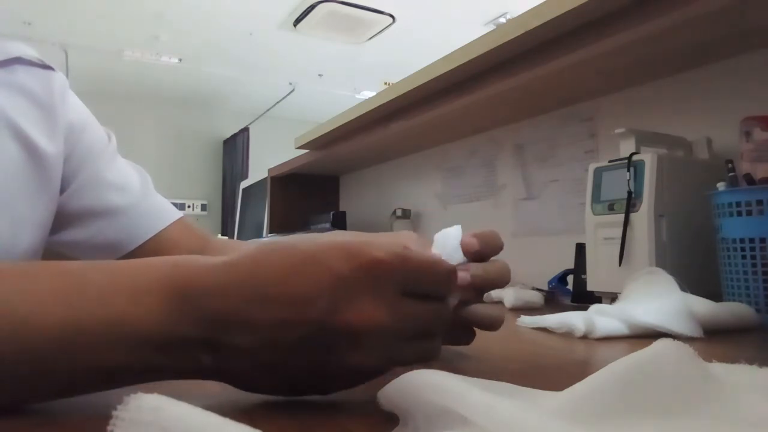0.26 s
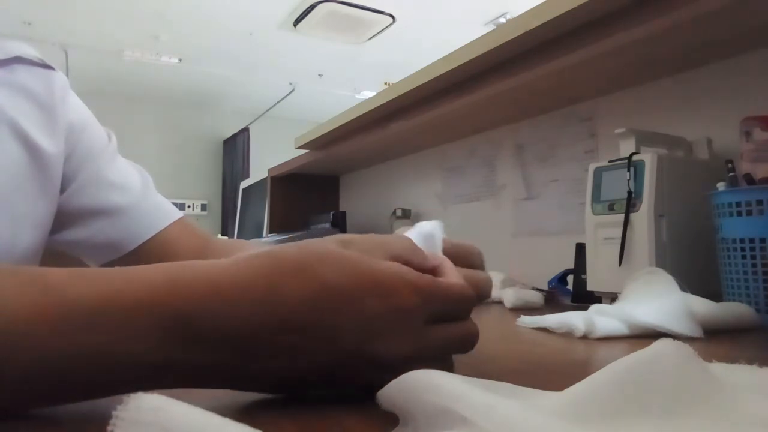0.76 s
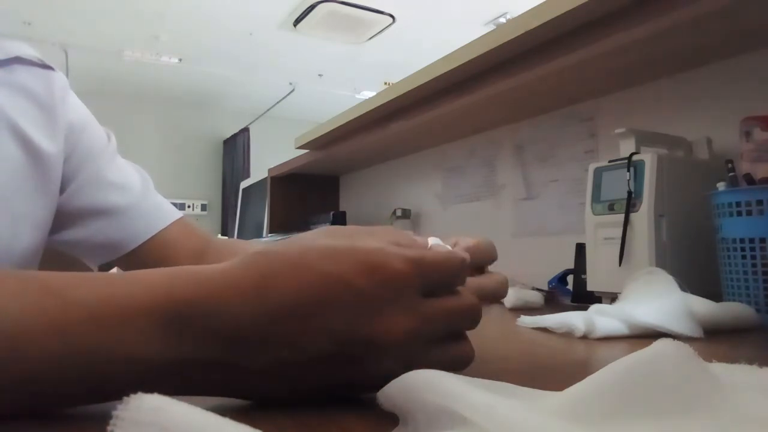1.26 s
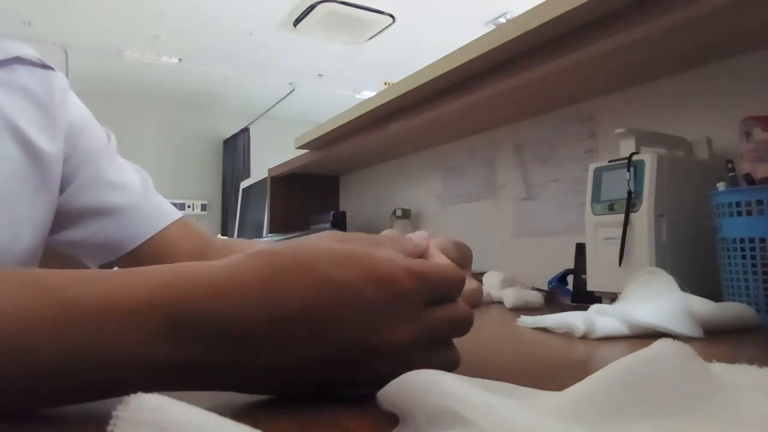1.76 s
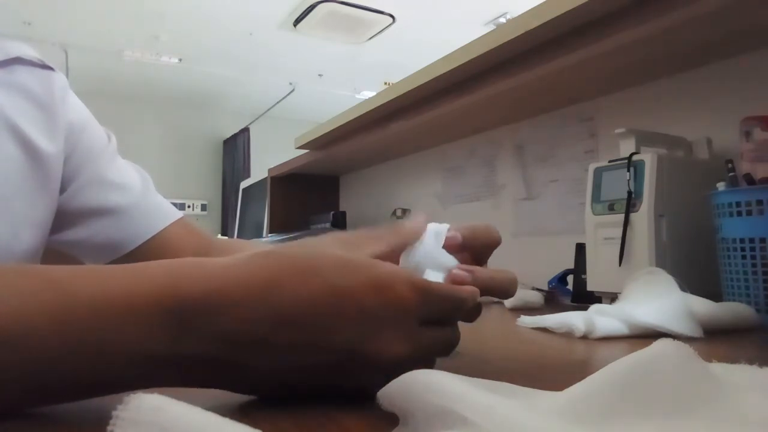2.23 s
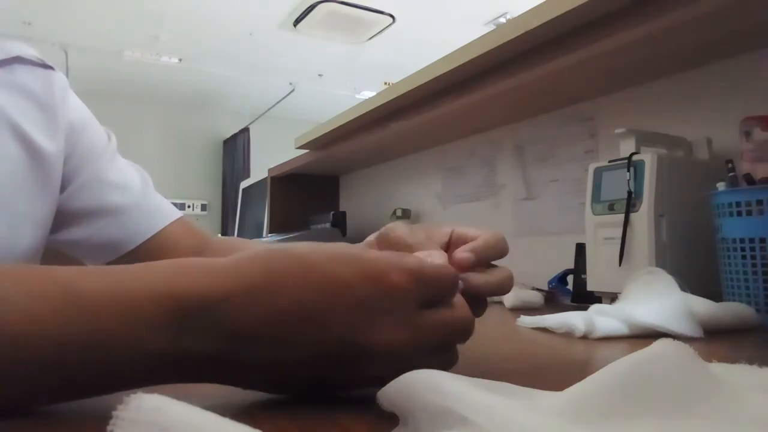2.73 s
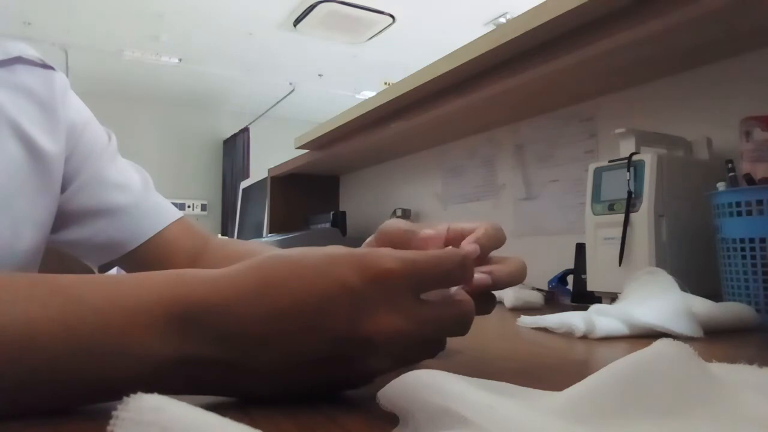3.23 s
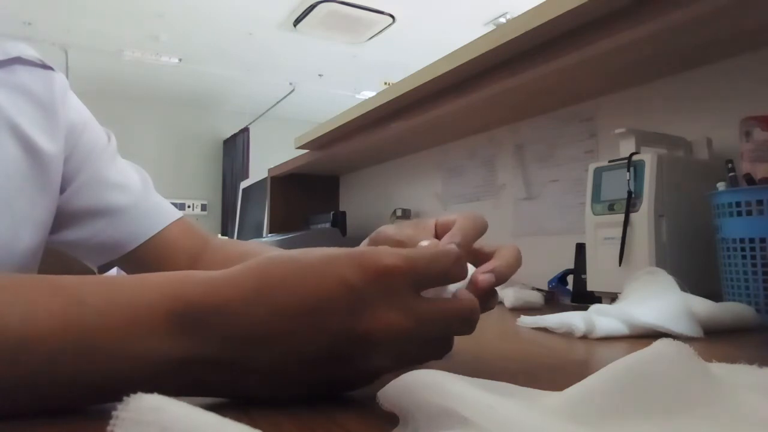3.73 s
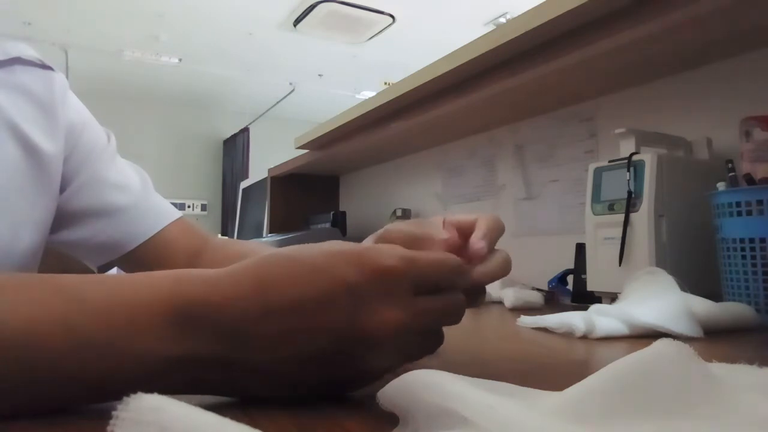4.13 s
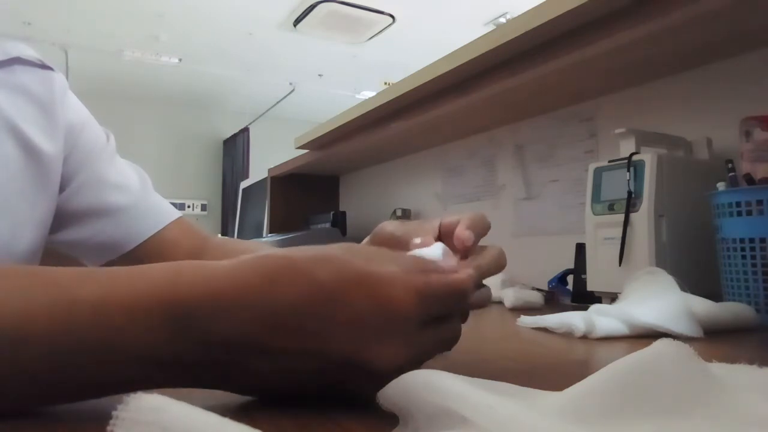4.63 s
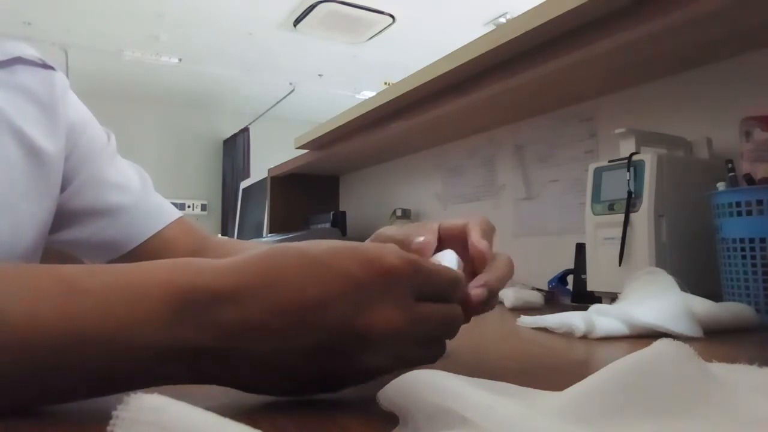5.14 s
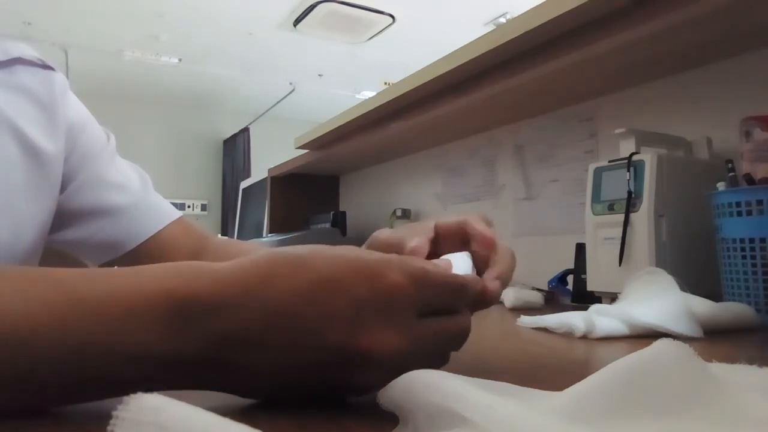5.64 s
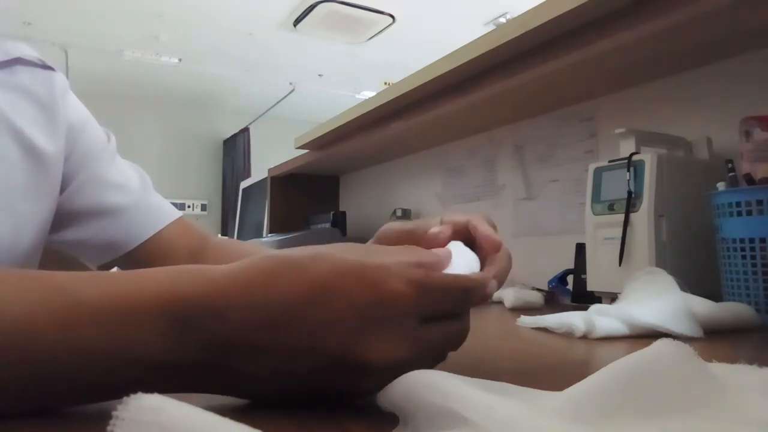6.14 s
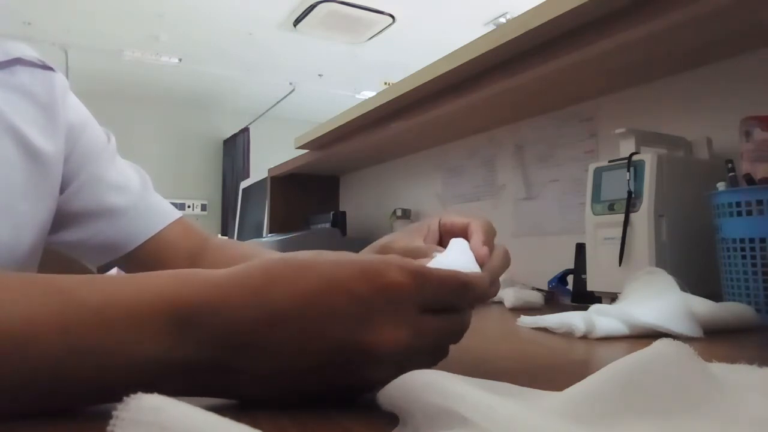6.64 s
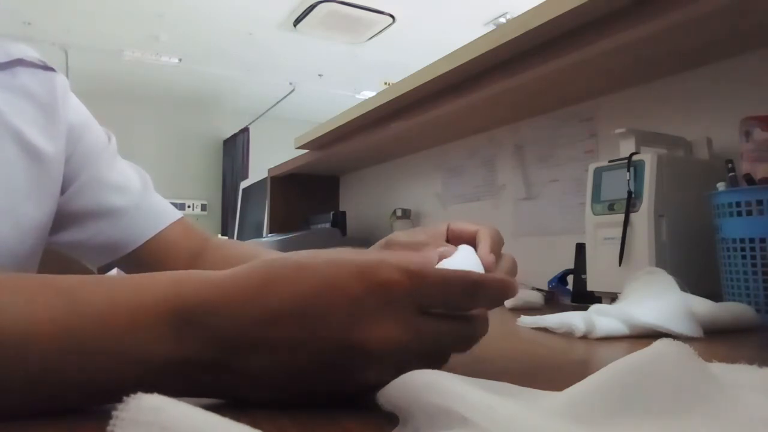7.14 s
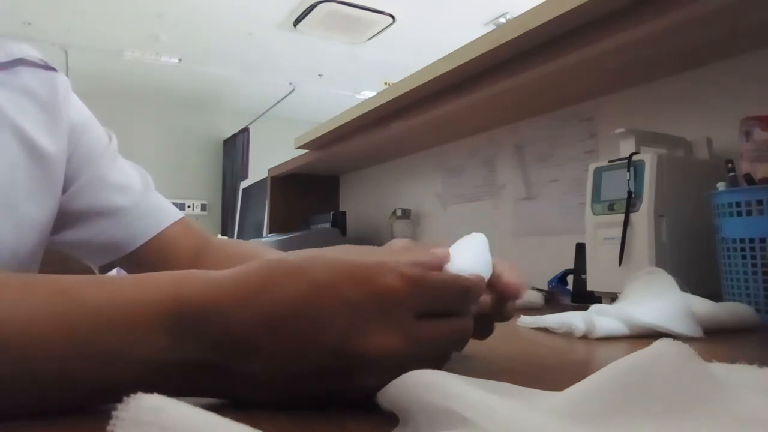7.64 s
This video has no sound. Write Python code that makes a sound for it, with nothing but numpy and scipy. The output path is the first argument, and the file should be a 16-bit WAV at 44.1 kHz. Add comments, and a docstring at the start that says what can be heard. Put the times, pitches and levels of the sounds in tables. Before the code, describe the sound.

Throughout the 8 seconds a ceiling air conditioner gives a steady, bass-heavy rush of air, dark and muffled, with low room and duct resonances. Its upper middle is slightly brighter at first, settles over about two seconds and then breathes gently. Beneath it, low wavering drones like distant engines overlap: rough hums near 100 and 78 Hz at the start, a clearer one gliding down from 1.25 to 3.5 s, another from 3.75 to 4.85 s with a swell near 4.2 s, then more between 5 and 7.3 s, swelling around 6.2 and 6.85 s. A fainter, higher hum near 235 Hz passes at 6.5-7.7 s, and a very deep tone rises near the end. A faint fan whine holds at 370 Hz. At 2.14 s one soft, short, dry fingertip knock touches the desk. Very quiet microphone hiss lies on top.

```python
"""Ceiling air conditioner in a furnished room

A broad, steady air rush, noise shaped by a spectrum and low room and duct resonances, carries the scene.
Under it low drones, perhaps distant engines, glide and swell: near sines with random strength and phase.
A faint fan whine is made the same way; one soft knock rings the desk as a few decaying modes.
Microphone hiss, shaped noise, lies on top."""
import sys
import numpy as np
from scipy import signal
from scipy.fft import rfft, irfft, next_fast_len
from scipy.io import wavfile

SR = 44100
rng = np.random.default_rng(int(sys.argv[2]) if len(sys.argv) > 2 else 0)


def put_to_file(sound):
    """Save the sound as 16-bit audio at rate SR, in the file named by the first command-line argument."""
    columns = np.atleast_2d(sound).T  # one column per channel
    safe = np.clip(columns, -1, 1)
    whole_steps = np.round(safe * 32767)
    wavfile.write(sys.argv[1], SR, whole_steps.astype(np.int16))


N = 347366  # length in samples


def from_db(db):
    """Decibels to amplitude gain."""
    return 10 ** (np.asarray(db) / 20)


def rms_one(x):
    """Scale to unit rms."""
    return x / np.sqrt(np.mean(x ** 2) + 1e-20)


def drift(rate_hz):
    """Slow random wander of unit rms: noise through two one-pole low-passes, run at every 40th sample."""
    step = 40
    pole = np.exp(-2 * np.pi * rate_hz * step / SR)
    noise = rng.standard_normal(N // step + 2002)
    slow = signal.lfilter([1], [1, -2 * pole, pole * pole], noise)[2000:]  # drop the filter's start-up
    return np.interp(np.arange(N) / step, np.arange(len(slow)), rms_one(slow))


def coloured(spectrum, resonances=()):
    """Unit-rms noise with the given spectrum; each resonance adds a bell of power."""
    size = next_fast_len(N)
    hz = np.maximum(np.arange(size // 2 + 1) * SR / size, 1)
    points = np.array(spectrum)
    density_db = np.interp(np.log(hz), np.log(points[:, 0]), points[:, 1])
    power = from_db(density_db) ** 2
    lift = 1
    for centre_hz, width_hz, added_db in resonances:
        lift = lift + from_db(added_db) ** 2 / (1 + (2 * (hz - centre_hz) / width_hz) ** 2)
    white = rfft(rng.standard_normal(size))
    return rms_one(irfft(white * np.sqrt(power * lift), size)[:N])


HISS_DB = -78  # rms before the top cut
# Hiss colour, relative density per Hz: pitch_hz, density_db
HISS_SPECTRUM = [(1500, -30.5), (3000, -14), (4000, -2.5), (5300, 0.5), (6500, -2), (8500, -2.5),
                 (11000, -0.5), (16000, -1.5)]


def microphone_hiss():
    """Self-noise of the microphone: steady noise weighted to the treble."""
    return from_db(HISS_DB) * coloured(HISS_SPECTRUM)


SWELL_RISE_S, SWELL_FALL_S = 0.11, 0.19
SWELL_REACH_HZ = 6  # how near in pitch a drone must lie
# Brief drone swells (a negative lift dips): peak_s, pitch_hz, lift_db
DRONE_SWELLS = [(1.3, 106.5, 8), (3.8, 107, -1), (4.2, 85, 9), (4.35, 104, 4.5), (5.6, 96.6, 3.5),
                (6.2, 123, 8.5), (6.85, 120, 8), (7.8, 52, 5)]


def swell_db(t, pitch_hz):
    """Lift along a pitch track: quick rise, slower fall, only from swells near its pitch."""
    total_db = 0
    for peak_s, centre_hz, lift_db in DRONE_SWELLS:
        time_shape = ((t - peak_s) / np.where(t < peak_s, SWELL_RISE_S, SWELL_FALL_S)) ** 2
        pitch_shape = ((pitch_hz - centre_hz) / SWELL_REACH_HZ) ** 4
        total_db = total_db + lift_db * np.exp(-time_shape - pitch_shape)
    return total_db


FADE_S = 0.14  # fades lie just outside the start and end times
WAVER_HZ = 2.47  # rms pitch waver at roughness 1


def drone(start_s, end_s, first_hz, last_hz, level_db, roughness):
    """A near sine with an even glide, wavering pitch and partly random strength and phase."""
    t = np.arange(N) / SR
    pitch_hz = np.interp(t, [start_s, end_s], [first_hz, last_hz])
    coarse_t = t[::200]  # swells are slow enough for every 200th sample
    lift_db = np.interp(t, coarse_t, swell_db(coarse_t, pitch_hz[::200]))
    fade_in = np.clip((t - start_s) / FADE_S + 1, 0, 1)
    fade_out = np.clip((end_s - t) / FADE_S + 1, 0, 1)
    wavering_hz = pitch_hz + WAVER_HZ * roughness * drift(4.23)
    phase = 2 * np.pi * (np.cumsum(wavering_hz) / SR + rng.random())
    tone = (1 + roughness * drift(5.9)) * np.sin(phase)
    tone = tone + roughness * drift(4.6) * np.cos(phase)
    level_match = np.sqrt(2 / (1 + 2 * roughness ** 2))  # unit rms at any roughness
    return level_match * fade_in * fade_out * from_db(level_db + lift_db) * tone


# Low drones, level before swells: start_s, end_s, first_pitch_hz, last_pitch_hz, level_db, roughness (0-1)
LOW_DRONES = [(0, .95, 103, 102, -44.5, .4), (0, 3.3, 78, 78, -48, .6), (0, 6.3, 49.5, 51.5, -62, .3),
              (1.25, 3.55, 107, 99, -41, .18), (3.75, 4.85, 108.5, 101, -40.5, .2),
              (3.95, 5.9, 85, 84, -51, .6), (4.9, 6.8, 97, 96, -42, .4), (5.4, 7.35, 127.5, 117, -44, .28),
              (6.45, 7.7, 241, 229, -54, .6), (6.55, 8, 51.6, 52.2, -50, .12)]


def low_drones():
    """Overlapping low tones, perhaps distant engines, each gliding between two pitches."""
    return sum(drone(*row) for row in LOW_DRONES)


def fan_whine():
    """Faint tone of the fan, held around one pitch throughout with a slight waver."""
    return drone(0, N / SR, first_hz=370, last_hz=370, level_db=-61.5, roughness=0.25)


# Knock on the desk, strength of the push: time_s, strike_db
DESK_KNOCKS = [(2.142, -20.5)]
# Ringing modes of the desk top: pitch_hz, level_db, t60_s
DESK_MODES = [(335, -3, 0.02), (428, 1, 0.021), (617, -4.5, 0.011), (800, -29, .012)]


def knock():
    """A soft fingertip contact, a short rounded push, rings the desk top; the small panel radiates little bass."""
    clicks = np.full(N, 1e-18)  # a tiny offset instead of pure silence
    for time_s, strike_db in DESK_KNOCKS:
        clicks[round(time_s * SR)] = -from_db(strike_db)
    push = signal.lfilter(np.hanning(44) / 22, [1], clicks)  # about 1 ms long
    ring = 0
    for pitch_hz, level_db, t60_s in DESK_MODES:
        decay = from_db(-60 / (t60_s * SR))
        angle = 2 * np.pi * pitch_hz / SR
        strength = from_db(level_db) * np.sin(angle)
        ring = ring + signal.lfilter([0, strength], [1, -2 * decay * np.cos(angle), decay * decay], push)
    bass_cut = signal.butter(4, 285, "high", fs=SR, output="sos")
    return signal.sosfilt(bass_cut, ring)


RUSH_DB = -39  # rms before the upper middle band is moved
BRIGHT_START_DB, BRIGHT_END_DB, BRIGHT_SETTLE_S = 2, -2, 1.6  # upper middle band starts bright and settles
BREATH_DB = 1.1  # rms wander of that band
# Air rush colour, relative density per Hz: pitch_hz, density_db
AIR_SPECTRUM = [(13, -58), (22, -30), (55, -15), (90, -7), (108, -3), (204, -10.5), (239, -12.5),
                (293, -13), (482, -14.5), (540, -17), (890, -19.5), (1540, -30.5), (1880, -44.5),
                (3100, -55), (5000, -64.5), (6500, -88), (11000, -120)]
# Room and duct resonances, power added relative to the rush: pitch_hz, width_hz, added_db
ROOM_RESONANCES = [(80.6, 7, 3.5), (103, 21, 0.5), (168.9, 17, 3.5), (240.3, 25, 2.5), (333.6, 12, 0.5),
                   (446, 13, -2.5), (490, 20, -1), (639, 27, -3), (850, 34, -7), (2136, 274, 5)]


def air():
    """Turbulent rush from the outlet; its upper middle band settles and breathes a little on its own."""
    settling = np.exp(-(np.arange(N) / SR / BRIGHT_SETTLE_S) ** 2)
    bright_db = BRIGHT_END_DB + (BRIGHT_START_DB - BRIGHT_END_DB) * settling
    rush = coloured(AIR_SPECTRUM, ROOM_RESONANCES)
    size = next_fast_len(N)
    hz = np.arange(size // 2 + 1) * SR / size
    low_edge = 1 + (900 / np.maximum(hz, 1)) ** 4
    high_edge = 1 + (hz / 2500) ** 8
    upper = irfft(rfft(rush, size) / low_edge / high_edge, size)[:N]
    upper_gain = from_db(bright_db + BREATH_DB * drift(4.1))
    return from_db(RUSH_DB) * (rush + (upper_gain - 1) * upper)


def scene():
    """Drones, fan whine, knock and air at one microphone."""
    return (low_drones() + fan_whine() + knock() + air())[None]


def record(dry):
    """The microphone drops the deepest bass and adds its hiss; the top is cut steeply."""
    bass_cut = signal.butter(2, 18, "high", fs=SR, output="sos")
    wet = signal.sosfilt(bass_cut, dry) + microphone_hiss()
    top_cut = signal.ellip(14, 0.5, 60, 15700, fs=SR, output="sos")
    return signal.sosfilt(top_cut, wet)


dry = scene()
out = record(dry)
put_to_file(out)
```